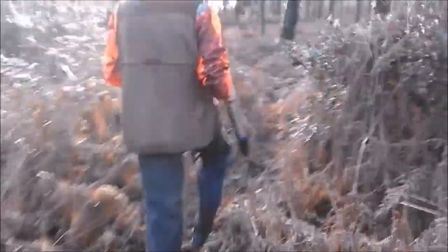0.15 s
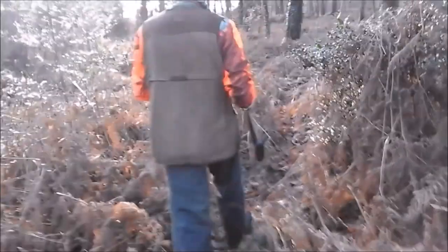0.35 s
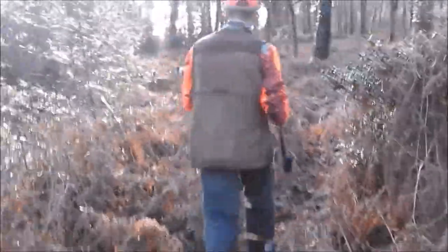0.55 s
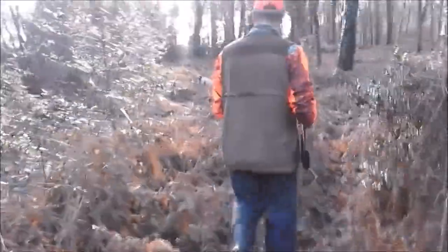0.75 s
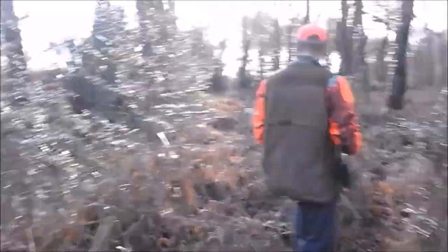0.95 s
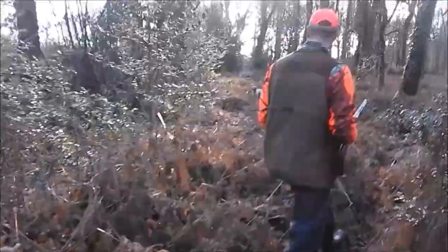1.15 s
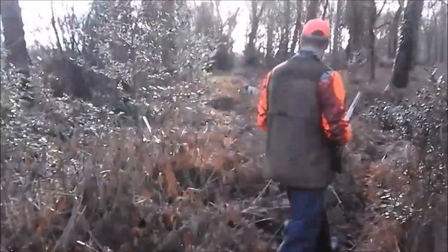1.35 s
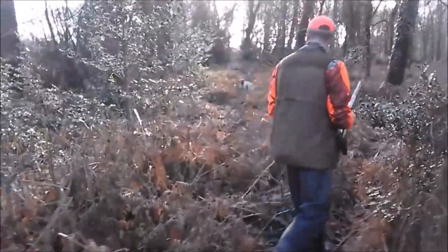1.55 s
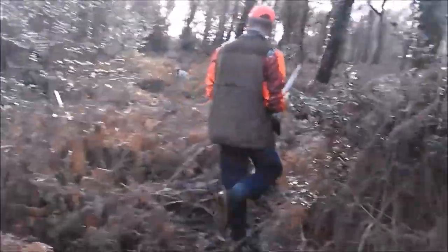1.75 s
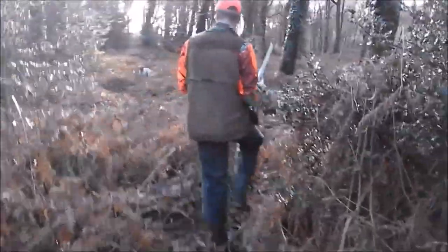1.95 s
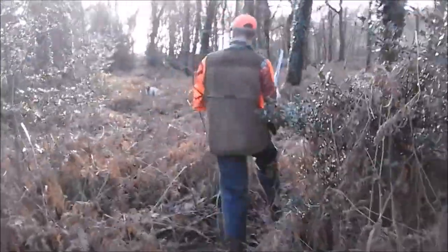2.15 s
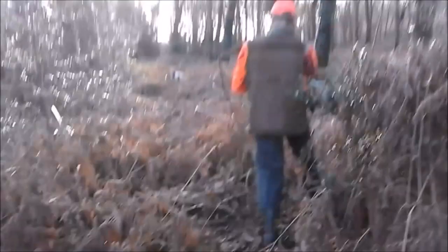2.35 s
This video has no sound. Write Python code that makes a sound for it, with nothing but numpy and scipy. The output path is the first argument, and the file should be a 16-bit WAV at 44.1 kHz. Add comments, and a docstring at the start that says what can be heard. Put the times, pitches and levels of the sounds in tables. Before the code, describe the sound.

Footsteps push through dry woodland ferns in three surges of crisp rustling and crackling. Early on, a stem snaps loudly with a thud right by the microphone; softer knocks follow irregularly, with faint hiss behind.

```python
"""Walking through dry bracken

In a wood, on a small mono microphone. Legs sweep the fronds into a grainy rustle of tiny
ticks and swish, and stems crack, each ringing briefly in a burst of grit. Short dull knocks
land close to the microphone, one with a loud snap. Behind them lie a faint wavering hum,
a woodland wash and the microphone's own hiss and rumble."""
import sys
import numpy as np
from scipy import signal
from scipy.fft import rfft, irfft
from scipy.io import wavfile

SR = 44100
rng = np.random.default_rng(int(sys.argv[2]) if len(sys.argv) > 2 else 0)


def put_to_file(sound):
    """Save the sound as 16-bit audio at rate SR, in the file named by the first command-line argument."""
    columns = np.atleast_2d(sound).T  # one column per channel
    safe = np.clip(columns, -1, 1)
    whole_steps = np.round(safe * 32767)
    wavfile.write(sys.argv[1], SR, whole_steps.astype(np.int16))


N = 110250

# Legs sweeping through the fronds: time_s, fronds_db, shuffle_db, fizz_db
LEG_SWEEP = [(0, -66, -75, -83), (.05, -63, -67, -77.5), (0.112, -60.5, -61, -76.5),
             (0.137, -61.5, -69.5, -62.5), (.18, -62, -67.5, -75), (0.251, -56.5, -62, -71.5),
             (.285, -57.5, -57, -72), (0.311, -65, -72, -78.5), (0.381, -61, -62.5, -76.5),
             (.43, -69.5, -75, -83.5), (.5, -75.5, -77, -90), (.6, -70.5, -79, -86), (.78, -72.5, -76, -86),
             (0.915, -68, -69.5, -84.5), (0.967, -58.5, -66, -78.5), (1.03, -66, -69.5, -81),
             (1.08, -63, -64.5, -80), (1.144, -70.5, -74, -85.5), (1.23, -68.5, -71.5, -82.5),
             (1.33, -73, -77, -88.5), (1.45, -83.5, -80.5, -96.5), (1.58, -77.5, -89, -81.5),
             (1.68, -81, -83, -99), (1.749, -73, -75, -87), (1.87, -70.5, -80.5, -82.5),
             (1.944, -59, -62.5, -76.5), (1.98, -64.5, -72.5, -81), (2.068, -63.5, -72.5, -76.5),
             (2.12, -69, -72, -82), (2.26, -77, -81, -88), (2.305, -71.5, -71, -81.5),
             (2.36, -74.5, -77, -82), (2.39, -68.5, -68, -86), (2.415, -72, -73.5, -83),
             (2.5, -70, -73, -85)]
# Upper range of the fronds over the lower: time_s, tilt_db
FROND_TILT = [(0, -2), (.3, -2.5), (.5, 6.5), (.8, 0), (.95, -8.5), (1.1, -8.5), (1.3, -2.5), (1.75, -4.5),
              (1.94, 0.5), (2.1, 3.5), (2.3, -14.5), (2.5, 5.5)]
# Spectra of the dry fronds, their low shuffle and their treble fizz: frequency_hz, level_db
FROND_SPECTRUM = [(600, -29.5), (1000, -10.5), (1400, -6.5), (2000, -4.5), (2800, -4), (3600, -2.5),
                  (4300, -3.5), (5000, -5), (5800, -12.5), (7000, -22), (9000, -37), (15700, -48)]
SHUFFLE_SPECTRUM = [(60, -32), (130, -4), (230, -6), (450, 0.5), (1000, -3), (1400, -14), (2500, -35.5)]
FIZZ_SPECTRUM = [(4500, -40), (7000, -4.5), (9500, -4.5), (12000, -9), (15700, -13)]
def rustle():
    """Legs brush the bracken: ticks and dense swish in three ranges, each following the sweep."""
    ticks = frond_ticks()
    swish = amp(1.8 * drift(30, slowest=0.29)) * rng.standard_normal(N)
    scuff = amp(2.5 * drift(30)) * rng.standard_normal(N)
    fronds = colour(ticks + 1.72 * swish, FROND_SPECTRUM)
    lower = lowpass(fronds, hz=4700)
    tilt = amp(curve(FROND_TILT) + drift(10)) ** 0.5
    fronds = lower / tilt + (fronds - lower) * tilt
    shuffle = colour(scuff + 0.26 * ticks, SHUFFLE_SPECTRUM)
    fizz = colour(0.69 * ticks + swish, FIZZ_SPECTRUM)
    return (amp(curve(LEG_SWEEP, column=1)) * fronds
            + amp(curve(LEG_SWEEP, column=2)) * shuffle
            + amp(curve(LEG_SWEEP, column=3)) * fizz)


def frond_ticks(per_s=7000, low_hz=300.7, high_hz=13080, pitches=30, cycles=5):
    """Dry fronds give tiny ticks of many pitches, in clumps, a few large."""
    size_db = 1.64 * np.minimum(rng.exponential(1, N), 5)
    clump_db = 3 * drift(60, slowest=0.27)
    impulses = amp(size_db + clump_db) * (rng.random(N) < per_s / SR) * rng.choice([-1, 1], N)
    pitch_index = rng.integers(0, pitches, N)
    ticks = np.zeros(N)
    for k, hz in enumerate(np.geomspace(low_hz, high_hz, pitches)):
        turns = np.arange(300) / SR * hz
        tick = turns * np.exp(-3 * turns / cycles) * np.sin(2 * np.pi * turns)
        tick *= np.sqrt(hz) / np.linalg.norm(tick)
        ticks += signal.oaconvolve(impulses * (pitch_index == k), tick)[:N]
    return evened(ticks)


# Stems cracking along the way: start_s, level_db, pitch_hz, burst_t60_s, edge_db, ring_cycles
STEM_CRACKS = [(0.0368, -54, 1950, 0.012, -31, 2.8), (0.0565, -42, 3620, 0.016, -24, 1.4),
               (0.0607, -45.5, 3430, 0.018, -15, 3.2), (0.106, -48, 1930, 0.022, -33, 3.1),
               (0.1107, -40.5, 3920, 0.036, -24, 1.5), (0.1252, -43, 3800, 0.0087, -21, 2.5),
               (0.14, -44, 5100, 0.017, -10.5, 3.3), (0.168, -45.5, 3040, 0.016, -29, 2.8),
               (0.2547, -41.5, 3920, 0.019, -30, 2.5), (0.2785, -44, 3360, 0.018, -25, 2.5),
               (0.282, -42, 3930, 0.015, -17.5, 2.7), (0.3688, -47.5, 5040, 0.035, -14, 3.3),
               (0.377, -40.5, 2300, 0.009, -38, 1.5), (0.3876, -45.5, 4300, 0.009, -30, 3.4),
               (0.402, -51, 2130, 0.025, -18, 2.3), (0.5654, -58, 4860, 0.0095, -15, 2.3),
               (0.5862, -54, 3500, 0.012, -22, 4), (0.6594, -52, 3940, 0.0077, -30, 2.3),
               (0.8044, -45.5, 3250, 0.0045, -37, 0.9), (0.9324, -47, 3200, 0.0059, -37, 3.1),
               (0.9674, -45.5, 3650, 0.009, -26, 1.9), (0.9988, -47.5, 3300, 0.0081, -31, 2.8),
               (1.014, -46, 2470, 0.019, -28, 2.5), (1.054, -46, 2700, 0.024, -37, 1.7),
               (1.0644, -45, 3660, 0.016, -39, 4), (1.1123, -54, 3340, 0.01, -31, 2.5),
               (1.2204, -57, 1770, 0.016, -32, 2.5), (1.2431, -48, 3730, 0.015, -30, 2.5),
               (1.263, -48, 2550, 0.014, -30, 2.1), (1.3195, -44, 3334, 0.012, -38, 4.5),
               (1.5618, -57.5, 4150, 0.012, -17, 3), (1.8115, -46.5, 3650, 0.0074, -31, 2.34),
               (1.8931, -43, 2920, 0.019, -18, 1.4), (1.9069, -48, 3420, 0.019, -17, 1.5),
               (1.9302, -51, 2640, 0.009, -19, 2.5), (1.9335, -38.5, 5260, 0.021, -29, 4.9),
               (1.9369, -39, 4970, 0.0091, -22, 3), (1.9443, -40, 3400, 0.015, -34, 3.6),
               (1.96, -44.5, 5060, 0.016, -21, 3.1), (1.965, -52, 3410, 0.016, -22, 2.5),
               (1.9983, -42, 4370, 0.019, -22, 3), (2.0161, -46.5, 2430, 0.011, -30, 2),
               (2.0317, -43.5, 3030, 0.011, -21, 2.4), (2.0394, -46, 2540, 0.015, -31, 1.3),
               (2.052, -54, 3620, 0.012, -30, 2.7), (2.0625, -51, 4500, 0.018, -8.5, 2.8),
               (2.0877, -44, 2600, 0.01, -40, 1.5), (2.09, -45, 2500, 0.013, -40, 2.1),
               (2.1064, -44.5, 3400, 0.012, -39, 1.6), (2.1392, -55, 4370, 0.015, -24, 1.6),
               (2.1653, -52, 3330, 0.006, -26, 1.7), (2.2922, -50.5, 3270, 0.011, -34, 2.6),
               (2.3152, -54, 3300, 0.012, -33, 2.8), (2.3272, -56.5, 3470, 0.019, -30, 2.5),
               (2.3344, -42.5, 2800, 0.0087, -34, 2.5), (2.3793, -52, 2270, 0.025, -40, 0.7),
               (2.3853, -51, 2620, 0.018, -35, 1.5), (2.3912, -54, 2800, 0.012, -35, 1.5),
               (2.4482, -59.5, 1850, 0.013, -24, 3.1)]
# Treble cut on the fizz that makes a crack's bright edge: frequency_hz, gain_db
CRACK_EDGE_TILT = [(9000, -5.5), (15700, -14)]
def stem_crack(level_db, hz, burst_t60_s, edge_db, ring_cycles, rise_s=0.000593, grit_share=0.44):
    """A stem rings for a few cycles inside a burst of grit around the same pitch, with a bright edge."""
    noise = rng.standard_normal(1024)
    t = np.arange(len(noise)) / SR
    after_rise = np.maximum(t - rise_s, 0)
    swell = 2 * after_rise * hz / ring_cycles
    ring = swell * np.exp(1 - swell) * np.sin(2 * np.pi * hz * after_rise)
    band = [(hz / 4, -24), (hz / 2, -6), (hz, 0), (hz * 2, -10), (hz * 4, -28)]
    grit = colour(colour(noise, FROND_SPECTRUM), band)
    edge = colour(colour(noise, FIZZ_SPECTRUM), CRACK_EDGE_TILT)
    edge *= amp(edge_db - 0.5 * 1000 * t)  # fades 0.5 dB per ms faster than the grit
    burst = np.minimum(t / rise_s, 1) ** 2 * amp(-60 * after_rise / burst_t60_s)
    return amp(level_db) * ((1 - grit_share) * ring + burst * (grit_share * grit + edge))


def stem_snap(at_s, width_ms=0.062, edge_hz=11500, ring_hz=4700):
    """A stem breaks right by the microphone: a spike up and down, a bright edge, a ring, splinters."""
    t = np.arange(600) / SR
    ms = t * 1000
    lead_s = 4 * width_ms / 1000
    widths = ms / width_ms - 4
    after_break = np.maximum(t - lead_s, 0)
    spike = -widths * np.exp(0.5 - widths ** 2 / 2)
    edge = np.exp(-(widths / 0.83) ** 2) * np.cos(2 * np.pi * edge_hz * t)
    ring = -np.exp(-after_break / 0.00038) * np.sin(2 * np.pi * ring_hz * after_break)
    splinters = colour(rng.standard_normal(len(t)), FROND_SPECTRUM) * np.exp(-(ms - 3) ** 2)
    return at_s - lead_s, amp(-11) * spike + amp(-23) * edge + amp(-26.5) * ring + amp(-38.5) * splinters


# Dull knocks close to the microphone: main_swing_s, level_db, swing_ms, lead_in_ratio, decay_swings
CLOSE_KNOCKS = [(.110, -42, 0.38, 0.5, 1.4), (0.176, -52, 0.8, 0, 1), (0.3572, -22.5, 0.82, 0, 2.2),
                (.6450, -33.5, 0.92, 0.62, 1.08), (.748, -57.5, 1.8, 0, 1.06),
                (0.846, -41.5, 0.94, 0.32, 1.23), (0.931, -55, 1.1, 0.4, 1.2), (0.992, -57, 2.2, 0.4, 0.77),
                (1.040, -55, 1.5, 0.2, 1.3), (1.0551, -45, 1.84, 0.7, 1.1), (1.151, -59.5, 2.3, 0, 1.7),
                (1.2215, -56, 0.7, 0.2, 4.4), (1.227, -53, 1.44, 0.5, 1.8),
                (1.2312, -42.5, 0.55, 0.47, 0.46), (1.236, -41, 1.27, 1, 1.4),
                (1.2387, -45.5, 0.88, 0.7, 1.84), (1.373, -46, 1.12, 0.44, 0.85),
                (1.39, -57, 0.92, 0.2, 2.9), (1.6125, -42, 0.75, 0.02, 2.2),
                (1.7229, -41.5, 0.96, 0.75, 1.2), (1.7967, -51.5, 0.94, 0, 2.5),
                (1.869, -58.5, 1.4, 0.5, 1.7), (1.893, -51.5, 1.1, 1, 1.27), (2.033, -53.5, 0.47, 0.2, 2.8),
                (2.0919, -47.5, 1.03, 0.13, 1.16), (2.342, -41.5, 0.61, 0.2, 1.9),
                (2.4217, -49.5, 1.43, 0.1, 0.99), (2.484, -58.5, 2.2, 0.4, 1.5)]
def knock(main_swing_s, level_db, swing_ms, lead_in_ratio, decay_swings,
          stretch=1.84, boom_hz=96, boom_ms=5):
    """A pressure swing that slows as it dies, after a short opposite lead-in, and a low after-swing."""
    t = np.arange(2000) / SR
    lead_s = swing_ms / 1000 / stretch
    # Each swing lasts `stretch` times as long as the one before.
    swings = np.log(1 + t * (stretch - 1) / lead_s) / np.log(stretch)
    decay = np.exp(-(np.maximum(swings - 1, 0) / decay_swings) ** 3)
    pressure = np.where(swings < 1, lead_in_ratio, decay) * np.sin(np.pi * swings)
    boom = np.exp(-t * 1000 / boom_ms) * np.sin(2 * np.pi * boom_hz * t)
    boom *= amp(-22) * swing_ms * decay_swings
    return main_swing_s - lead_s, amp(level_db) * (pressure + boom)


# A hum in the background: time_s, level_db
HUM_LEVELS = [(0, -93), (1.4, -87), (1.7, -85.5), (1.95, -75), (2.2, -86.5), (2.5, -89)]
def hum(pitch_hz=231):
    """A faint low tone that wavers in pitch and level."""
    turns = np.cumsum(pitch_hz * (1 + 0.02 * drift(5))) / SR
    return amp(curve(HUM_LEVELS) + 1.7 * drift(8)) * np.sqrt(2) * np.sin(2 * np.pi * turns)


# The wood all around: frequency_hz, level_db
WOODLAND_SPECTRUM = [(60, 1), (170, -8.5), (225, -4.5), (300, -10.5), (900, -13), (1000, -10.5),
                     (1200, -20.5), (2000, -15), (3500, -15), (4700, -17.5), (6200, -21.5), (10000, -23),
                     (15700, -21.5)]
def woodland_wash(level_db=-76.5):
    """A faint, broad noise whose level wavers slightly."""
    return amp(level_db + 0.76 * drift(9)) * colour(rng.standard_normal(N), WOODLAND_SPECTRUM)


# The microphone's own rumble and hiss: frequency_hz, level_db
RUMBLE_SPECTRUM = [(12, -9), (22, -0.5), (36, -15.5), (100, -12.5), (200, -43.5)]
HISS_SPECTRUM = [(15, -19), (40, -7.5), (170, -0.5), (700, -3), (1300, -10), (3900, -12.5), (5500, -4.5),
                 (15700, -5)]
def microphone_noise(rumble_db=-89, hiss_db=-83):
    """Circuit rumble, alike in both channels, and hiss of opposite polarity in each."""
    rumble = amp(rumble_db + 1.8 * drift(4)) * colour(rng.standard_normal(N), RUMBLE_SPECTRUM)
    hiss = amp(hiss_db) * colour(rng.standard_normal(N), HISS_SPECTRUM)
    return np.array([rumble + hiss, rumble - hiss])


def amp(db):
    return 10 ** (np.asarray(db) / 20)


def evened(x):
    return x / np.sqrt(np.mean(x ** 2) + 1e-20)


def add(mix, start_s, sound):
    part = mix[round(start_s * SR):][:len(sound)]
    part += sound[:len(part)]


def lowpass(x, hz):
    return signal.filtfilt(*signal.butter(2, hz, fs=SR), x)


def curve(table, column=1):
    """One column of a timed table, interpolated to every sample."""
    rows = np.array(table)
    return np.interp(np.arange(N) / SR, rows[:, 0], rows[:, column])


def colour(x, spectrum):
    """Filters x by a spectrum table, rms 1."""
    table_hz, table_db = np.transpose(spectrum)
    hz = np.fft.rfftfreq(len(x), 1 / SR)
    gain = amp(np.interp(np.log(hz + 1), np.log(table_hz + 1), table_db))
    return evened(irfft(rfft(x) * gain, len(x)))


def drift(hz, slowest=0.016):
    """Random wander at rates between slowest * hz and hz, rms 1."""
    b, a = signal.butter(1, [hz * slowest, hz], "band", fs=SR)
    return evened(signal.lfilter(b, a, rng.standard_normal(N)))


def scene(snap_s=0.2261, bass_loss_db_per_s=1.5):
    """The walk as it reaches the microphone, the same in both channels."""
    mix = rustle() + hum() + woodland_wash()
    # The low end thins as the walker draws away.
    bass_gain = amp(-bass_loss_db_per_s * np.arange(N) / SR)
    mix -= lowpass(mix, hz=180.9) * (1 - bass_gain)
    # The loud snap sits on a thud.
    add(mix, *stem_snap(snap_s))
    add(mix, *knock(snap_s, level_db=-16.5, swing_ms=0.66, lead_in_ratio=0,
                    decay_swings=1.88, stretch=1.4))
    for row in CLOSE_KNOCKS:
        add(mix, *knock(*row))
    for start_s, *stem in STEM_CRACKS:
        add(mix, start_s, stem_crack(*stem))
    return np.array([mix, mix])


def record(dry, low_hz=70, high_hz=15850):
    """The small microphone rolls off the bass, adds its own noise and cuts the highest treble."""
    b, a = signal.butter(2, low_hz, "high", fs=SR)
    picked_up = signal.lfilter(b, a, dry) + microphone_noise()
    band_limit = signal.firwin(511, high_hz, window=("kaiser", 7), fs=SR)
    return signal.oaconvolve(picked_up, band_limit[None], "same")


dry = scene()
out = record(dry)
put_to_file(out)
```